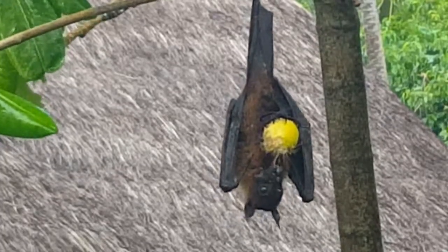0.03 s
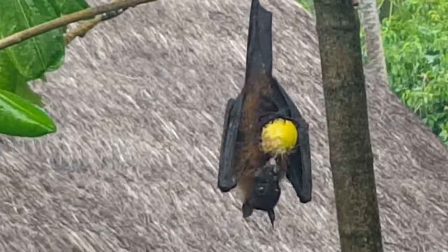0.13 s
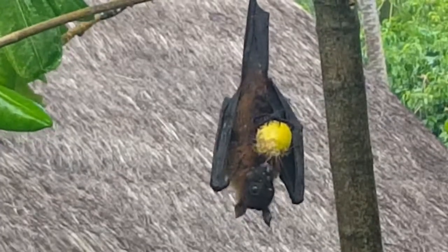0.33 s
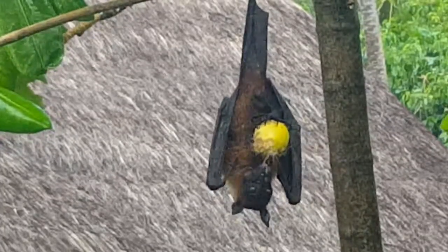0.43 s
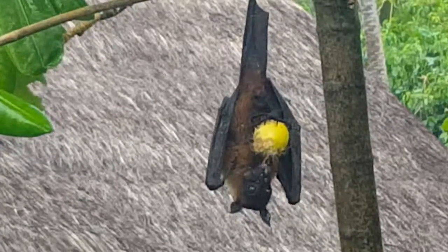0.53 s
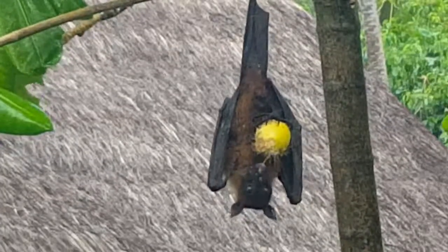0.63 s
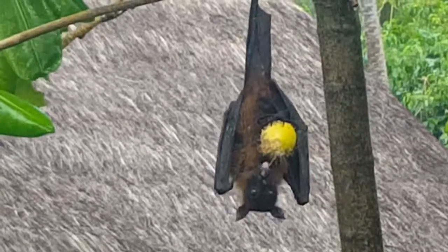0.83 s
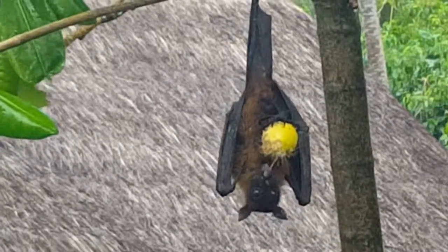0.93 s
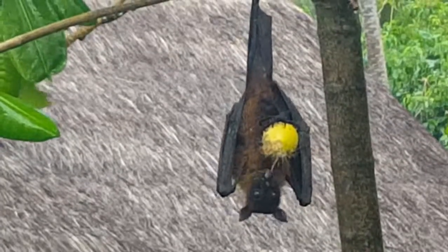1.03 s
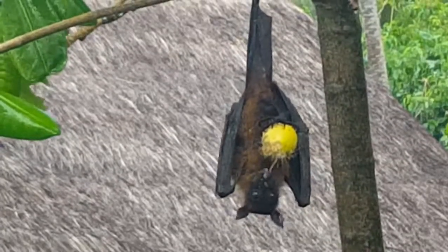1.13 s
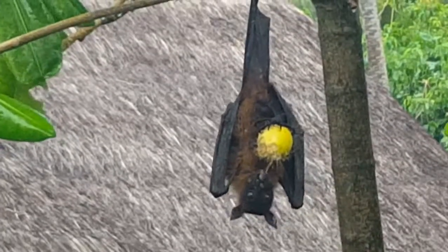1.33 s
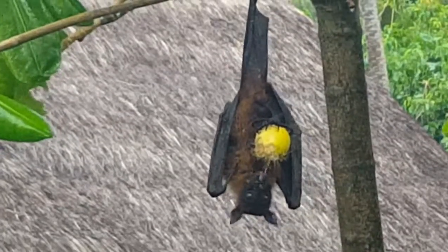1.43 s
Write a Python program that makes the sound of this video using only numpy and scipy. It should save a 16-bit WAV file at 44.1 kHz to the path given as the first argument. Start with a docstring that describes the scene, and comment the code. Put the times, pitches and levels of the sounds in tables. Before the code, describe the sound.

Four harsh, raspy bat squawks in quick succession outdoors, then a few tiny ticks

```python
"""A broad outdoor wash of leaves and water (shaped noise) and light wind (low lumpy noise) run throughout.
From 0.21 s a fruit bat near a two-port microphone gives four short, hoarse squawks, the last ending at
0.81 s: snapping vocal folds, a second throat vibration and breath noise make them. Two tiny creaks
(noise bursts) follow the first squawk. From 0.88 s come six small ticks: short rings, each with a snap."""
import sys
import numpy as np
from scipy import signal
from scipy.fft import rfft, irfft
from scipy.io import wavfile
from scipy.ndimage import uniform_filter1d

SR = 44100
rng = np.random.default_rng(int(sys.argv[2]) if len(sys.argv) > 2 else 0)


def generate_wav(signal):
    """Clip the signal to [-1, 1] and save it as 16-bit WAV at the path in sys.argv[1]."""
    frames = np.transpose(np.atleast_2d(signal))
    scaled = np.clip(frames, -1, 1) * 32767
    pcm = np.round(scaled).astype(np.int16)
    wavfile.write(sys.argv[1], SR, pcm)


def invert_db(x):
    """Field ratio 10**(x/20) for x, a level in decibels (scalar or array-like)."""
    u = np.asarray(x, float) / 20
    return 10 ** u


N = 66150  # length [samples]


def evened(x):
    """Scales a sound to an rms of 1."""
    return x / np.sqrt(np.mean(x ** 2) + 1e-20)


def steady(x):
    """Holds the running level at 1, so that a level curve can shape it later."""
    power = uniform_filter1d(x ** 2, 300, mode="reflect")
    power = uniform_filter1d(power, 300, mode="reflect")
    return x / np.sqrt(power + 1e-20)


def wobble(count, size):
    """Smooth random drift of rms 1; a larger size drifts more slowly."""
    drift = uniform_filter1d(rng.standard_normal(count), size)
    return evened(uniform_filter1d(drift, size))


def read(points, hz, order=1):
    """Reads one column of a table along a log-frequency axis."""
    columns = np.transpose(points)
    return np.interp(np.log(hz + 1), np.log(columns[0] + 1), columns[order])


def colour(x, points):
    """Filters a sound to the given spectrum, without sounding ahead of its input (minimum phase)."""
    log_gain = np.log(invert_db(read(points, abs(np.fft.fftfreq(4096, 1 / SR)))))
    phase = -signal.hilbert(log_gain).imag
    taps = np.fft.ifft(np.exp(log_gain + 1j * phase)).real[:1024]
    return signal.fftconvolve(x, taps)[:len(x)]


def add(mix, start_s, sound):
    """Mixes a sound in at its start time, cutting off what runs past the end."""
    part = mix[..., round(start_s * SR):][..., :sound.shape[-1]]
    part += sound[..., :part.shape[-1]]


# how strong the wash is at each pitch: (frequency [Hz], relative level [dB per Hz])
WASH_SPECTRUM = [(24, -38), (40, -9), (124, -2), (220, -11), (297, -8.5), (646, -10), (715, -12.5),
                 (1440, -12), (1630, -14.5), (2910, -16), (6490, -27), (12500, -28), (16000, -39.5)]
# how the wash differs between the ports:
# (frequency [Hz], left minus right [dB], likeness [0-1], phase by which left leads [radians])
WASH_STEREO = [(40, 7, 0.98, 1.5), (141, -1, 0.66, -1), (463, -0.5, 0.9, -0.5), (945, 0.5, 0.32, 1.5),
               (1810, 0, 0.34, 3.5), (2470, 0, 0.035, -3.5), (4300, -5, 0.033, 4.), (7000, 1, 0.15, -3),
               (15500, -0.5, 0.029, 14)]


def wash():
    """Distant leaves and water: many small sounds blur into noise, with patches and swells of level."""
    level_db, patch_db, swell_db = -42, 1.2, 0.4
    frames, hz = N // 256 + 5, np.fft.rfftfreq(1024, 1 / SR)
    a, b, c, d, patches = rng.standard_normal((frames, 513, 5)).T
    patches = uniform_filter1d(patches, 12, 0)  # across frequency
    patches = evened(uniform_filter1d(patches, 10, 1))  # across time
    left, other = a + 1j * b, c + 1j * d
    same = np.clip(read(WASH_STEREO, hz, order=2), -1, 1)[:, None]
    lag = np.exp(-1j * read(WASH_STEREO, hz, order=3))[:, None]
    lean = invert_db(read(WASH_STEREO, hz) / 2)[:, None]
    right = same * lag * left + np.sqrt(1 - same ** 2) * other
    spectra = np.array([lean * left, right / lean])
    swells = swell_db * wobble(frames, size=6)
    spectra *= invert_db(read(WASH_SPECTRUM, hz)[:, None] + patch_db * patches + swells)
    sound = signal.istft(spectra, nperseg=1024, noverlap=768)[1][:, :N]
    return invert_db(level_db) * evened(sound)


# strength of the wind: (time [s], level before a small trim [dB], left minus right [dB])
WIND_GUSTS = [(0.0, -39.5, 14), (0.028, -55, 4.5), (0.124, -62, 1), (0.188, -41.5, 14), (0.216, -43.5, 10),
              (0.304, -40, 14), (0.37, -53.5, 0), (0.416, -32.5, -3.5), (0.466, -58.5, -6),
              (0.884, -55.5, -12), (0.91, -45, 13), (0.964, -72, -5), (1.082, -46, 20), (1.11, -49, 12),
              (1.206, -49, 16), (1.5, -51.5, 6.5)]


def port_buffeting():
    """Wind at one port: noise in uneven lumps, passed twice through a low, wide resonance."""
    peak_hz, width_hz, low_cut_hz, lump_db = 117, 207, 59.5, 3.5
    lumpy = rng.standard_normal(N) * invert_db(lump_db * wobble(N, size=200))
    resonance = signal.iirpeak(peak_hz, peak_hz / width_hz, fs=SR)
    low = signal.lfilter(*resonance, signal.lfilter(*resonance, lumpy))
    return evened(signal.lfilter(*signal.butter(2, low_cut_hz, "high", fs=SR), low))


def wind():
    """Light wind buffets each port with its own noise, following the table of gusts."""
    trim_db = 0.5
    s, level_db, pan_db = np.transpose(WIND_GUSTS)
    t = np.arange(N) / SR
    level_db, pan_db = np.interp(t, s, level_db), np.interp(t, s, pan_db)
    left = port_buffeting() * invert_db(level_db + pan_db / 2)
    right = port_buffeting() * invert_db(level_db - pan_db / 2)
    return np.array([left, right]) * invert_db(trim_db)


def tick(level_db, hz, pan_db):
    """A small tick: a pure ring and a noisy snap die away together."""
    t60_s, snap_db = 0.026, -14  # time to fall by 60 dB; snap against ring
    t = np.arange(1200) / SR
    ring = np.sin(2 * np.pi * hz * t)
    snap = invert_db(snap_db) * rng.standard_normal(1200)
    sound = (ring + snap) * invert_db(level_db - 60 * t / t60_s)
    return sound * invert_db(np.array([[pan_db / 2], [-pan_db / 2]]))


# the small ticks: (time [s], level of the ring at its start [dB], pitch [Hz], left minus right [dB])
TICK_EVENTS = [(.879, -42, 1380, 3), (1.051, -40.5, 2330, .5), (1.239, -33, 1360, -5),
               (1.257, -42, 1400, 0), (1.268, -41, 1300, 0), (1.309, -48, 2380, 0)]


def ticks():
    """Places each tick at its time."""
    mix = np.zeros((2, N))
    for s, *settings in TICK_EVENTS:
        add(mix, s, tick(*settings))
    return mix


# how the bat reaches the two ports:
# (frequency [Hz], left minus right [dB], phase by which left leads [radians])
PATH_TO_PORTS = [(463, 6, 0), (1190, -1.5, 0), (1800, 0.5, -.2), (2600, 1, -0.9), (3060, 4, -1.5),
                 (4100, -1.5, -1.47), (4550, 11.5, -2), (5370, -12, -2), (6350, -2, -6), (7370, 2.5, -7.5),
                 (8960, -1, -9), (9450, -9, -7.5), (10140, 14, -4.5), (11470, 17, -4), (13020, -20, -5.2),
                 (14300, 15, -11), (15300, 9, -11)]


def at_ports(bat):
    """The bat's sound reaches each port differently, then scatters briefly off branches and roof."""
    scatter_db, t60_s = -8, 0.05
    treble_tilt = 0.71  # 0-1, how much more the treble scatters
    hz = np.fft.rfftfreq(N, 1 / SR)
    half = invert_db(read(PATH_TO_PORTS, hz) / 2) * np.exp(0.5j * read(PATH_TO_PORTS, hz, order=2))
    direct = irfft(rfft(bat) * np.array([half, 1 / half]), N)
    t = np.arange(3000) / SR
    sparse = rng.random((2, 3000)) < 0.05
    taps = rng.choice([-1., 1.], (2, 3000)) * sparse
    taps = taps * invert_db(-60 * t / t60_s) * (t > 0.002)
    taps = taps[:, 1:] - treble_tilt * taps[:, :-1]
    taps /= np.linalg.norm(taps, axis=1, keepdims=True)
    scatter = signal.fftconvolve(direct, taps, axes=1)[:, :N]
    return direct + invert_db(scatter_db) * scatter


# tone colour of the hiss: (frequency [Hz], relative level [dB])
HISS_SPECTRUM = [(1000, -20.5), (3000, -5), (4800, -17.5), (6700, -11.5), (8000, -9), (8800, -14.5),
                 (10100, 0.5), (10900, -12.5), (11700, -2.5), (13400, -16.5), (14200, -14.5),
                 (15300, -11.5), (16500, -42)]


def hiss_coloured(noise):
    """Gives noise the uneven peaks of the bat's hiss."""
    return colour(noise, HISS_SPECTRUM)


def creak(level_db):
    """One lone snap of the folds: a quickly fading noise burst, coloured as the hiss."""
    burst = rng.standard_normal(200) * np.exp(-np.arange(200) / 20)
    snap = hiss_coloured(burst)
    return invert_db(level_db) * snap / abs(snap).max()


# single fold snaps as the first squawk ends: (time [s], peak level before the path to the ports [dB])
CREAK_EVENTS = [(0.3044, -36), (0.3081, -35)]


def creaks():
    """Places each lone fold snap at its time."""
    mix = np.zeros(N)
    for s, level_db in CREAK_EVENTS:
        add(mix, s, creak(level_db))
    return mix


# tone colour of the throat: (frequency [Hz], relative level [dB])
THROAT_SPECTRUM = [(60, -54), (200, -57), (700, -23), (850, -18), (1000, -10.5), (1450, -4.5), (1750, -5),
                   (2050, -7), (2550, -1.5), (3050, -12.5), (3700, -3.5), (4300, -12.5), (4750, -19.5),
                   (5300, -13), (6000, -10), (7400, -6.5), (8700, -26), (11000, -25), (16000, -46)]


def through_throat(x):
    """The throat's resonances colour a sound, which is then held at an even level."""
    return steady(colour(x, THROAT_SPECTRUM))


# a second vibration in the throat, beside the folds:
# (time [s], pitch [Hz], strength against the folds [ratio])
SECOND_VIBRATION = [(.245, 2600, 0.), (.255, 2650, .05), (.283, 2550, .05), (.288, 2520, .4),
                    (.291, 2560, 1.), (.294, 2560, 5.), (.299, 2550, 5.), (.302, 2550, 0.), (.4, 1650, 0.),
                    (.403, 1580, 1.2), (.408, 1495, 4.), (.416, 1380, 3.), (.422, 1555, 4.),
                    (.427, 1670, 1.6), (.438, 1690, 3.5), (.444, 1690, 3.5), (.447, 1680, 1.2),
                    (.455, 1580, 1.5), (.459, 1520, 0.), (.6, 1600, 0.), (.602, 1550, .8), (.607, 1520, .6),
                    (.609, 1500, 0.)]


def second_vibration(t, rough):
    """A second vibration with its own pitch, less regular when the voice is rough; also its strength."""
    jitter = 0.16  # rms share of the pitch at full roughness
    s, *columns = np.transpose(SECOND_VIBRATION)
    hz, share = (np.interp(t, s, c, left=0, right=0) for c in columns)
    hz = hz * (1 + jitter * rough * wobble(len(t), size=20))
    return np.cos(2 * np.pi * np.cumsum(hz) / SR), np.maximum(share, 0)


def fold_vibration(hz, rough):
    """The vocal folds' own swing: its pitch wavers a little and jitters when rough."""
    jitter, waver = 0.08, 0.008  # rms shares of the pitch, jitter at full roughness
    drift = jitter * rough * wobble(len(hz), size=20) + waver * wobble(len(hz), size=90)
    return np.cos(2 * np.pi * np.cumsum(hz * (1 + drift)) / SR)


def squawk(rows, voiced):
    """Folds snap open once a cycle, mixed with a second vibration; noise and hiss puff along."""
    breathy, voicing_s = 0.87, 0.0041  # roughness outside the voiced span, and how fast it sets in
    puff = 0.28  # share of the noise that comes in a puff with each cycle
    shimmer_db, flutter_db = 1.2, 2.5
    rasp_top_hz = 3450  # the rough noise is duller than the folds' snap
    s, *columns = np.transpose(rows)
    t = np.arange(s[0], s[-1], 1 / SR)
    hz, voice_db, hiss_db, sharp, rough = (np.interp(t, s, c) for c in columns)
    outside = np.clip(np.maximum(voiced[0] - t, t - voiced[1]) / voicing_s, 0, 1)
    rough = np.clip(rough + (breathy - rough) * outside, 0, 1)

    second, share = second_vibration(t, rough)
    vibration = (fold_vibration(hz, rough) + share * second) / (1 + share)
    opening = 1 / (1 - np.clip(sharp, 0.05, 0.98) * vibration)  # sharper folds open in narrower peaks
    swing = opening - uniform_filter1d(opening, 400, mode="reflect")
    # the level flutters more while two vibrations sound together
    unsteady_db = (shimmer_db + flutter_db * np.minimum(share, 1)) * wobble(len(t), size=60)
    tone = -through_throat(swing) * invert_db(unsteady_db)

    puffs = (1 - puff + puff * steady(opening)) * rng.standard_normal((2, len(t)))
    dull = signal.lfilter(*signal.butter(2, rasp_top_hz, fs=SR), puffs[0])
    voice = np.sqrt(1 - rough ** 2) * tone + rough * through_throat(dull)
    hiss = evened(hiss_coloured(puffs[1]))
    fades = np.minimum(1, np.minimum(t - s[0], s[-1] - t) / 0.00072)  # soft start and end
    return fades * (invert_db(voice_db) * voice + invert_db(hiss_db) * hiss)


# the course of each squawk, with levels before the path to the ports: (time [s], pitch [Hz],
# voice level [dB], hiss level [dB], fold sharpness [0-1], roughness while voiced [0-1])
FIRST_SQUAWK = [(.214, 1726, -49, -38, 1, .3), (.219, 1657, -39.5, -34.5, 1, 0),
                (.226, 1621, -34.5, -39.5, 1, 0), (.234, 1651, -28.5, -38, 0.87, 0.06),
                (.239, 1786, -32.5, -41, 0.84, .18), (.244, 1716, -31, -40.5, .9, 0),
                (.26, 1820, -31, -42, 0.77, 0.13), (0.271, 1800, -30, -36, 0.67, .18),
                (0.279, 1737, -32.5, -39, 0.9, 0), (.289, 1514, -32.5, -38.5, 0.7, 0.31),
                (.293, 1390, -36.5, -42, 0.7, 0.4), (.304, 1310, -51, -48, .8, .3)]
SECOND_SQUAWK = [(.389, 1111, -39, -34, 1, .25), (.394, 1180, -28.5, -41, 1, 0.11),
                 (0.4, 1276, -22.5, -40, 0.9, .16), (.406, 1247, -20, -35, 0.87, 0.29),
                 (.412, 1233, -22.5, -33, 0.66, 0.45), (.423, 1152, -20.5, -40, 0.8, 0.29),
                 (0.431, 1145, -23, -38, 0.75, 0.34), (.443, 1085, -21.5, -38, 0.82, 0.3),
                 (.448, 1256, -25, -41, 0.94, 0.34), (.455, 1283, -21.5, -55, 0.6, 0.31),
                 (.46, 1238, -27, -49, 0.73, 0.18), (.468, 1414, -27, -45, 0.67, 0.23),
                 (0.473, 1328, -24, -44, 0.73, 0.18), (.478, 1258, -37, -39, 1, 0.8),
                 (.486, 1270, -39, -49, 0.91, 0.41), (.492, 1240, -50, -62, .8, .3)]
THIRD_SQUAWK = [(.553, 785, -31.5, -35, 0.96, 0.34), (.5595, 794, -25, -34.5, 0.95, 0.23),
                (.561, 927, -25, -36, 0.97, .16), (.566, 1015, -22, -37, 0.96, 0.14),
                (.575, 1230, -20, -36, 0.9, .15), (.583, 1422, -14.5, -39, 0.65, 0.26),
                (.591, 1467, -19.5, -44, 0.72, 0.1), (.599, 1604, -17, -32, 0.76, 0.12),
                (0.6007, 1720, -20.5, -33, .85, 0.2), (.605, 1853, -21, -32, 0.87, 0.29),
                (.61, 2162, -30.5, -33.5, 0.99, 0.49), (0.616, 1820, -35, -37, 0.87, 0.67),
                (.628, 1800, -48, -55, 1, .5)]
FOURTH_SQUAWK = [(.74, 1622, -39, -33, 0.71, 0.26), (.745, 1608, -37.5, -36, 0.85, 0.12),
                 (.751, 1453, -33, -33, 0.89, .15), (.758, 1253, -35, -37, 1, .18),
                 (0.761, 1287, -34, -41, 1, 0.13), (.772, 1240, -29.5, -39, 0.97, .1),
                 (.78, 1183, -34, -46, 0.98, .1), (.788, 1094, -31.5, -40, .96, .12),
                 (.795, 959, -36.5, -41, 1, .15), (.802, 744, -40, -40, 1, 0.33),
                 (.812, 720, -43.5, -52, .9, .3)]
# when the folds vibrate, one row for each squawk: (start time [s], end time [s])
VOICED_SPANS = [(.218, .299), (.391, .484), (.554, .618), (.742, .802)]


def squawks():
    """Places the bat's four squawks, each starting at the first time in its table."""
    mix = np.zeros(N)
    for rows, voiced in zip((FIRST_SQUAWK, SECOND_SQUAWK, THIRD_SQUAWK, FOURTH_SQUAWK), VOICED_SPANS):
        add(mix, rows[0][0], squawk(rows, voiced))
    return mix


def scene():
    """Adds the wash, wind and ticks to the bat as it reaches the ports."""
    return wash() + wind() + ticks() + at_ports(creaks() + squawks())


def top_cut(x):
    """Nothing passes above the cut-off."""
    return signal.sosfilt(signal.butter(12, 16490, fs=SR, output="sos"), x)


def record(dry):
    """The microphone weakens the bass below 45 Hz."""
    mix = signal.lfilter(*signal.butter(2, 45, "high", fs=SR), dry)
    return top_cut(mix)


dry = scene()
out = record(dry)
generate_wav(out)
```